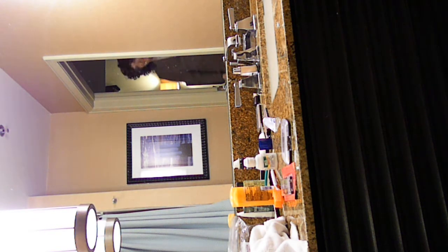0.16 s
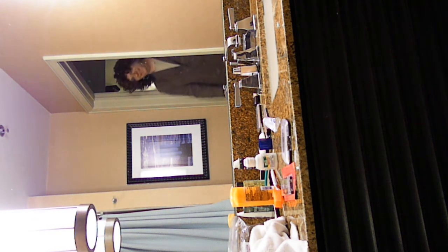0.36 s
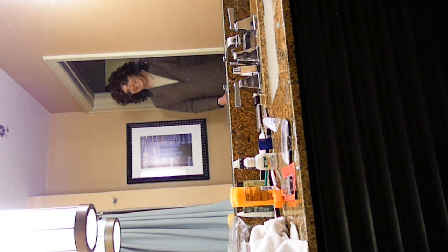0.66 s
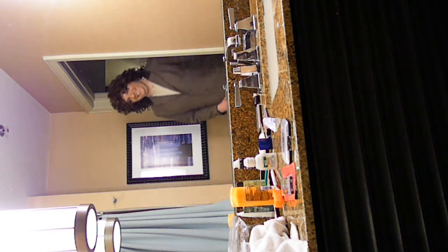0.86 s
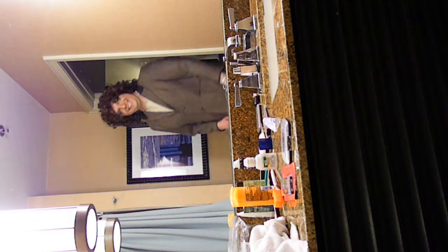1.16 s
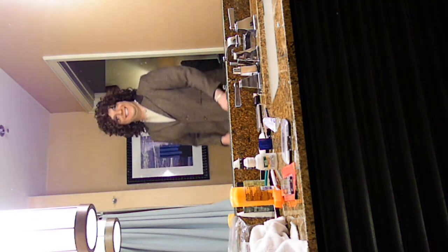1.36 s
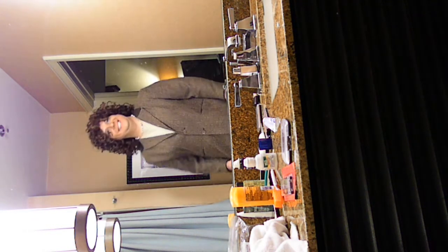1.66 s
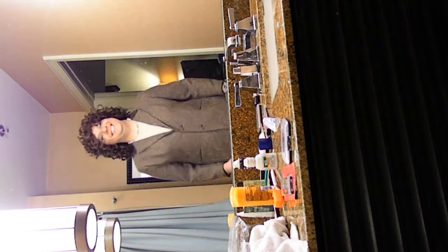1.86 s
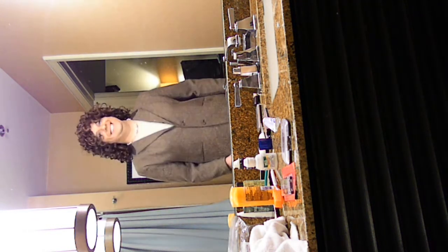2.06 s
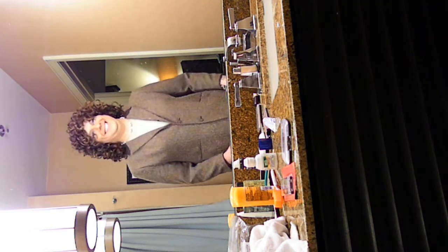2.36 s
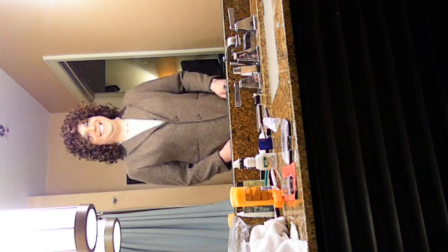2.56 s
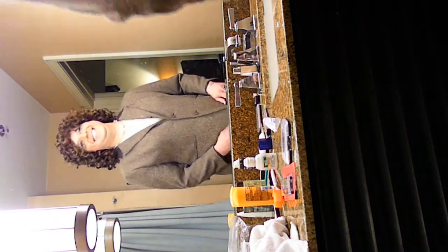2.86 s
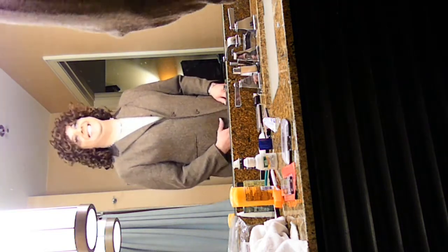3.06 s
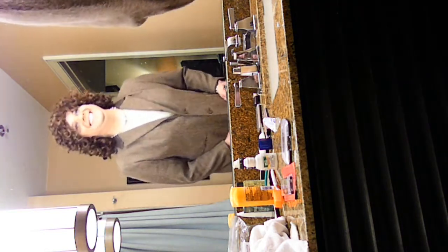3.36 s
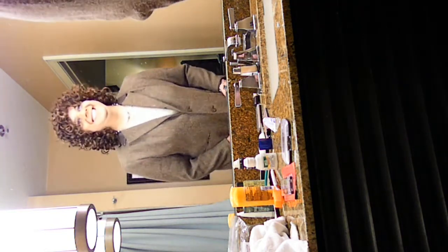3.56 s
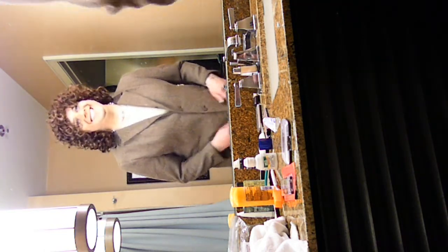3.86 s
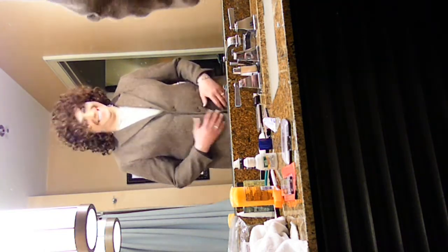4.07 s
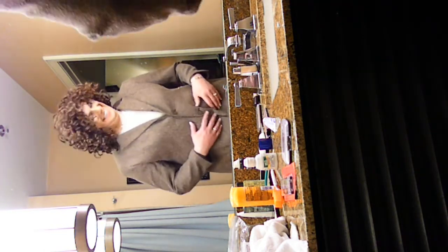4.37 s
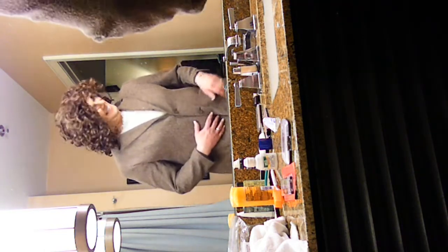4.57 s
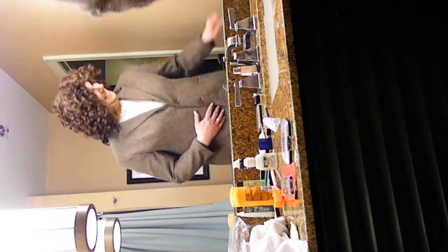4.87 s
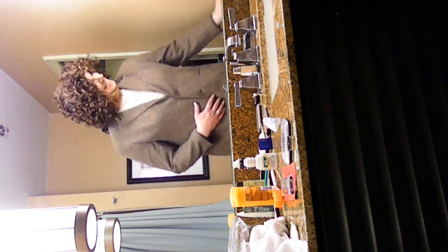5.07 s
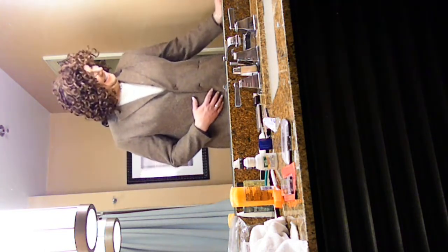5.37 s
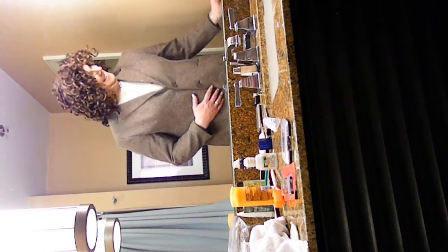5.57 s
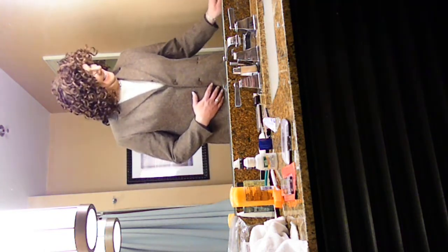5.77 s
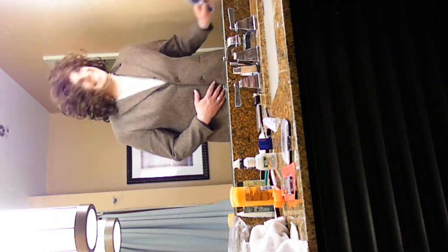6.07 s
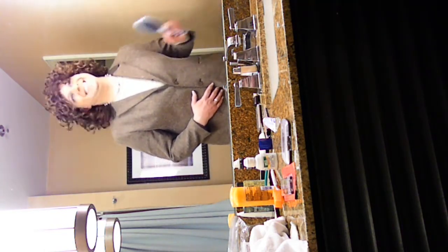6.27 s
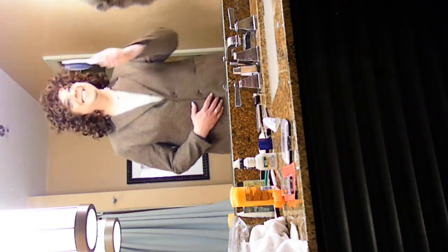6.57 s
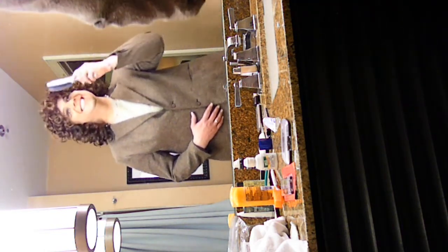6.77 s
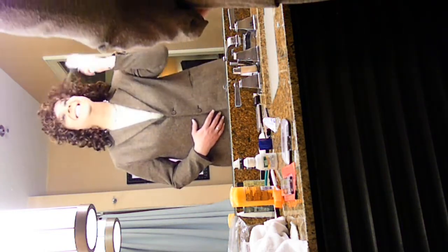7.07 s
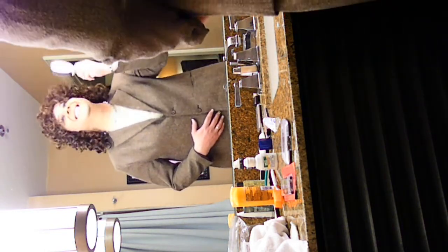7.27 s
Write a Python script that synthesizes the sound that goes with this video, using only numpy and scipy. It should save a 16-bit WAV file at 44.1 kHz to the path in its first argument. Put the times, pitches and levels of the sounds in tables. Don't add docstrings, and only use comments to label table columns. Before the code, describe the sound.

Hard heels knock across a tiled bathroom, quick at first then slower and softer, with rustling clothes, a brief metal jingle and a hairbrush clack.

```python
import sys
import numpy as np
from scipy import signal
from scipy.fft import rfft
from scipy.io import wavfile
from scipy.ndimage import uniform_filter1d

SR = 44100
rng = np.random.default_rng(int(sys.argv[2]) if len(sys.argv) > 2 else 0)


def to_linear_factor(level_db):
    exponent = np.asarray(level_db, float) / 20
    return 10 ** exponent


def to_wav(sig):
    pcm = np.clip(np.atleast_2d(sig), -1, 1) * 32767
    pcm = np.round(pcm).astype(np.int16)
    wavfile.write(sys.argv[1], SR, pcm.T)


N = 327663


def evened(x):
    return x / np.sqrt(np.mean(x ** 2) + 1e-20)


def read(points, hz):
    f, value = np.transpose(points)
    return np.interp(np.log(hz + 1), np.log(f + 1), value)


def add(mix, start_s, sound):
    part = mix[round(start_s * SR):][:len(sound)]
    part += sound[:len(part)]


def click(db):
    log_gain = np.log(to_linear_factor(np.maximum(db, -100)))
    circle = np.concatenate([log_gain, log_gain[-2:0:-1]])
    return np.fft.ifft(np.exp(np.conj(signal.hilbert(circle)))).real[:2048]


def noise(db, size=N):
    frames = size // 512 + 5
    a, b = rng.standard_normal((frames, 1025, 2)).T
    spectra = (a + 1j * b) * to_linear_factor(db)
    return signal.istft(spectra, nperseg=2048, noverlap=1536)[1][:size]


def room(direct_db):
    # (frequency [Hz], t60 [s])
    tiles = [(100, 0.4), (400, 0.5), (1000, 0.37), (2500, 0.45), (6000, 0.32), (14000, 0.14)]
    t = np.arange(SR * 3 // 4) / SR
    f, when, z = signal.stft(rng.standard_normal(len(t)), SR, nperseg=256)
    decay_db = -60 * when / read(tiles, f)[:, None]
    tail = signal.istft(z * to_linear_factor(decay_db), SR, nperseg=256)[1][:len(t)]
    tail *= 1 - np.exp(-t / 0.0017)
    power = uniform_filter1d(abs(rfft(tail, 2 ** 15)) ** 2, size=96)[::8]
    flatten = click(-10 * np.log10(power / power.mean()))
    tail = signal.fftconvolve(tail, flatten)[:len(t)]
    out = tail / np.linalg.norm(tail)
    out[0] += to_linear_factor(direct_db)
    return out


def ring(modes, seconds, longest_s):
    t = np.arange(round(seconds * SR)) / SR
    hz, db, t60_s = np.transpose(modes)[:, :, None]
    envelope = to_linear_factor(db - 60 * t / np.clip(t60_s, .01, longest_s))
    out = (envelope * np.sin(2 * np.pi * (hz * t + rng.random(hz.shape)))).sum(0)
    return out / abs(out).max()


def blow(colour, boom_db, knock_db, clack_db, direct_db):
    hz = np.fft.rfftfreq(4096, 1 / SR)
    shade = read([(200, boom_db), (400, 0.012), (900, knock_db), (2500, clack_db)], hz)
    push = click(read(colour, hz) + shade)
    sound = signal.fftconvolve(push, room(direct_db))[:SR * 3 // 4]
    return sound / abs(sound).max()


def puff(db, hz, width, hold_s, t60_s):
    t, f = np.arange(9000) / SR, np.fft.rfftfreq(4096, 1 / SR)
    decay_db = -60 * np.maximum(t - hold_s, 0) / max(t60_s, .001)
    burst = rng.standard_normal(len(t)) * to_linear_factor(decay_db)
    burst = signal.fftconvolve(burst, click(-12 * (np.log((f + 1) / hz) / width) ** 2))
    return to_linear_factor(db) * burst / abs(burst).max()


def heels():
    # (time [s], level of first 80 ms [dB], favoured mode 1 [Hz], favoured mode 2 [Hz])
    strikes = [
        (0.2429, -20.5, 291, 585),
        (0.8786, -17, 435, 385),
        (1.4719, -17, 480, 291),
        (2.064, -19, 282, 386),
        (2.7067, -25.5, 440, 575),
        (3.2518, -24, 418, 500),
        (4.7753, -27.5, 258, 381),
        (6.469, -28.5, 366, 480),
    ]
    # (early slap [dB], boom [dB], knock [dB], clack [dB])
    strike_shades = [(-0.5, 3, 3, 16), (2, -0.5, -4, 6), (1.5, 1, 2, 14.5), (2.5, 2, -5, 5.5), (4, 1, 3, 9),
                     (3, 3, 1, 16), (3.5, 7, -6.5, 1), (3, 2, -0.5, 7)]
    # (frequency [Hz], level [dB])
    heel_colour = [(40, -56.5), (80, -20), (140, -10.5), (250, -6), (400, 2), (700, -3), (1000, -13),
                   (1300, -23), (1550, -32.5), (1800, -42.5), (2500, -48), (3500, -57.5), (6000, -61),
                   (12000, -100)]
    # (frequency [Hz], level [dB], t60 [s])
    air_modes = [(160.9, -8.5, .6), (214.9, -3, 0.49), (269.3, -4.5, 0.64), (291, -1, 0.38),
                 (338, -7, 0.45), (366, -1, 0.52), (427.2, 1, 0.37), (480, 0, 0.37), (538, -5, 0.62),
                 (585, -6.5, 0.41), (688, -7, 0.61), (734, -11, 0.35), (877, -22.5, 0.59),
                 (940, -16.5, 0.56)]
    favour_db, favour_octaves = 8, 0.12
    out, t = np.zeros(N), np.arange(SR * 3 // 4) / SR
    low_cut = signal.butter(3, 105, "high", fs=SR, output="sos")
    hz, mode_db, t60_s = np.transpose(air_modes)
    for (start_s, db, *spot_hz), (slap_db, *shades) in zip(strikes, strike_shades):
        favour = sum(np.exp(-(np.log2(hz / f) / favour_octaves) ** 2) for f in spot_hz)
        modes = np.transpose([hz, mode_db + favour_db * favour, t60_s])
        air = ring(modes, .75, longest_s=0.76) * (1 - np.exp(-(t / 0.0022) ** 2))
        push = blow(heel_colour, *shades, direct_db=slap_db - 13.0)
        sound = evened(air) + evened(push)
        sound *= to_linear_factor(slap_db * np.exp(-(t / .036) ** 3))
        sound = signal.sosfilt(low_cut, sound)
        add(out, start_s, to_linear_factor(db + 0.98) * sound / np.std(sound[:SR * 2 // 25]))
    return out


def brush():
    # (time [s], peak [dB], boom [dB], knock [dB], clack [dB])
    knocks = [
        (5.5091, -21, -7, -12, 23),
        (5.514, -19, -6, 2, 8.5),
        (5.522, -20.5, 4, 0, -9),
        (5.545, -35, 6, -7, -7),
    ]
    # (frequency [Hz], level [dB])
    brush_colour = [(53, -67), (90, -20), (158, -3.5), (483, 0), (586, -7.5), (942, -9), (1720, -17.5),
                    (2480, -24), (2710, -28.5), (3150, -28), (15500, -37.5)]
    # (frequency [Hz], level [dB], t60 [s])
    handle = [(172, 0, 0.6), (364, 4.5, 0.4), (443, -2.5, 0.44), (964, 1, 0.19), (1317, 2, 0.11),
              (1541, 1.5, 0.15), (1920, -12, 0.19), (2486, -4.5, 0.18), (3200, -10, 0.11),
              (3420, -2, 0.036), (4780, -6, 0.056)]
    out = np.zeros(N)
    for start_s, db, *shades in knocks:
        add(out, start_s, to_linear_factor(db) * blow(brush_colour, *shades, direct_db=-15.0))
        add(out, start_s, to_linear_factor(db - 0.5) * ring(handle, .5, longest_s=0.53))
    return signal.sosfilt(signal.butter(2, 120, "high", fs=SR, output="sos"), out)


def taps():
    # (time [s], peak [dB], low group [Hz], high group [Hz], t60 [s])
    touches = [
        (7.095, -40, 500, 873, 0.32),
        (7.139, -29.5, 484, 1018, 0.16),
        (7.15, -48, 463, 940, 0.093),
        (7.168, -31, 248, 480, 0.11),
        (7.225, -41, 480, 1020, 0.11),
    ]
    out = np.zeros(N)
    for start_s, db, low_hz, high_hz, t60_s in touches:
        hz = np.outer([low_hz, high_hz], [.9, .95, 1, 1.04, 1.09]).ravel()
        sound = ring([(f, 0, t60_s) for f in hz], 0.12, longest_s=.3)
        soft_start = np.minimum(np.arange(len(sound)) / 60, 1)
        add(out, start_s, to_linear_factor(db) * sound * soft_start)
    return out


def jingle():
    # (time [s], level [dB])
    touches = [
        (.666, -31),
        (.674, -22),
        (.681, -19),
        (.686, -14.5),
        (.692, -20),
        (.703, -39),
        (0.717, -38),
        (.762, -27),
    ]
    # (frequency [Hz], level [dB], t60 [s])
    metal = [(4640, -9, .15), (4864, -4, .2), (4987, -1, .2), (5024, -2, .25), (5324, -4, .15),
             (5375, -5, .15), (5820, -4, .15), (6015, -2, .18), (6205, -5, .12), (7214, -6, .12),
             (7605, -4, .18), (8630, -6, .1)]
    # (frequency [Hz], level [dB])
    cluster = [(1760, -54), (3000, -24.5), (4420, -12.5), (4870, -1), (6110, -6), (6500, -9), (7260, -4),
               (7860, 0), (8410, -6.5), (13000, -32)]
    out = np.zeros(N)
    soft_start = 1 - np.exp(-np.arange(SR // 5) / SR / 0.0017)
    for start_s, db in touches:
        hz = np.exp(rng.uniform(np.log(2600), np.log(12500), size=110))
        t60_s = rng.uniform(0.026, 0.082, size=110)
        crowd = np.transpose([hz, read(cluster, hz), t60_s])
        sound = to_linear_factor(-13.5) * ring(metal, .2, longest_s=0.18) + ring(crowd, .2, longest_s=.1)
        add(out, start_s, to_linear_factor(db) * soft_start * sound)
    return signal.oaconvolve(out, room(direct_db=2.0))[:N]


def cloth():
    # (peak time [s], level [dB], rise [s], fall [s]); rise and fall span slope_db
    moves = [(.02, -54.5, 0.084, 0.46), (.255, -53, 0.018, .05), (.325, -43.5, 0.019, 0.14),
             (.62, -50, 0.23, 0.26), (.78, -48.5, .02, 0.056), (.9, -49.5, 0.032, 0.041),
             (1.02, -49.5, .08, .08), (1.28, -50.5, 0.44, .08), (1.46, -51, 0.27, 0.11),
             (1.63, -49, .04, 0.044), (1.8, -49.5, 0.25, 0.16), (2.08, -51.5, 0.16, 0.1),
             (2.27, -48.5, 0.053, 0.43), (2.53, -50, .3, .1), (2.95, -47.5, .12, .14),
             (3.19, -48, 0.026, 0.11), (3.4, -55, 0.18, 0.33), (3.95, -53.5, 0.089, .25),
             (4.54, -51, .2, 0.086), (4.68, -58.5, .1, 0.11), (4.84, -57, 0.1, 0.11), (5.02, -60, .1, 0.23),
             (5.44, -59, 0.052, 0.38), (6.23, -58, .12, 0.11), (6.7, -51.5, 0.33, 0.51),
             (6.87, -60, 0.14, 0.057), (7.109, -53, 0.062, 0.1), (7.19, -58, 0.12, 0.029)]
    # (frequency [Hz], level [dB])
    swish_colour = [(500, -22), (1000, 0), (1400, -1), (2000, -4), (3000, -3), (5000, -1), (8000, -0.5),
                    (12000, -37)]
    # (frequency [Hz], level [dB])
    fizz_colour = [(4000, -10), (7000, -10.5), (9000, -2.5), (12000, -5), (15800, -13)]
    slope_db, fizz_db, fizz_steepness, pivot_db = 10, 0.4, 1.21, -48
    hz, t = np.fft.rfftfreq(2048, 1 / SR), np.arange(0, N, 64) / SR
    peak_s, db, rise_s, fall_s = np.transpose(moves)[:, :, None]
    before = (peak_s - t) / np.maximum(rise_s, .003)
    after = (t - peak_s) / np.maximum(fall_s, .003)
    away = np.where(t < peak_s, before, after)
    power = (to_linear_factor(db - slope_db * away) ** 2).sum(0)
    effort_db = np.interp(np.arange(N) / SR, t, 10 * np.log10(power + 1e-12))
    grain = to_linear_factor(0.8 * evened(uniform_filter1d(rng.standard_normal(N), 200)))
    swish = evened(grain * noise(read(swish_colour, hz)[:, None])) * to_linear_factor(effort_db)
    fizz_level_db = pivot_db + fizz_db + fizz_steepness * (effort_db - pivot_db)
    fizz = evened(grain * noise(read(fizz_colour, hz)[:, None])) * to_linear_factor(fizz_level_db)
    return swish + fizz


def snaps():
    # (time [s], peak [dB], centre [Hz])
    ticks = [
        (.3155, -32, 12000),
        (2.211, -36, 13000),
        (2.29, -32, 11000),
        (2.334, -30, 10500),
        (2.3674, -25, 11300),
    ]
    out = np.zeros(N)
    for start_s, db, hz in ticks:
        add(out, start_s, puff(db, hz, width=.35, hold_s=0.00043, t60_s=0.0031))
    return out


def squeaks():
    # (time [s], peak [dB], centre [Hz])
    chirps = [
        (4.66, -58, 11200),
        (4.82, -55, 11200),
        (4.95, -56, 10600),
        (5.46, -46, 9860),
    ]
    out = np.zeros(N)
    for start_s, db, hz in chirps:
        add(out, start_s, puff(db, hz, width=.025, hold_s=0.018, t60_s=.06))
    return out


def bristles():
    # (time [s], peak [dB], centre [Hz], hold [s])
    strokes = [(5.459, -40, 12500, 0.017), (5.5, -48, 11000, .015), (5.598, -50, 5630, .2),
               (5.625, -40, 11500, .02), (5.672, -33.5, 12000, 0.024), (5.728, -40, 11000, .027),
               (5.786, -39, 11300, .035), (5.885, -43.5, 10500, .008), (5.924, -41.5, 6000, 0.059),
               (6.049, -40, 5500, 0.022)]
    out = np.zeros(N)
    for start_s, db, hz, hold_s in strokes:
        add(out, start_s, puff(db, hz, width=0.73, hold_s=hold_s, t60_s=0.19))
    return out


def scuffs():
    # (time [s], peak [dB], centre [Hz], relative width [1], hold [s])
    rubs = [(.315, -43, 9800, 0.35, 0.018), (2.666, -34.5, 1000, 1, .005), (7.093, -45, 610, 1, .06),
            (7.138, -45, 950, 0.59, 0.08), (6.055, -40, 3100, 1, .002)]
    out = np.zeros(N)
    for start_s, db, hz, width, hold_s in rubs:
        add(out, start_s, puff(db, hz, width, hold_s, t60_s=0.076))
    return out


def sway():
    # (time [s], level [dB])
    shifts = [(.39, -58), (1.6, -54), (2.75, -60), (3.3, -65), (6.5, -64)]
    sway_hz, sway_s = 30, .08
    t, out = np.arange(N) / SR, np.zeros(N)
    for peak_s, db in shifts:
        swell = to_linear_factor(db) * np.exp(-((t - peak_s) / sway_s) ** 2)
        out += swell * np.sin(2 * np.pi * (sway_hz * t + rng.random()))
    return out


def hum():
    # (frequency [Hz], level [dB])
    vent_colour = [(12, -46), (20, -13.5), (70, -16), (137, -5.5), (226, 1), (307, -4), (373, -1.5),
                   (467, -3.5), (793, -5.5), (2100, -17.5), (6410, -20.5), (7800, -21), (8720, -22),
                   (10300, -20), (15600, -24)]
    # (frequency [Hz], lift [dB])
    air_lifts = [(120, 0.5), (161, 11.5), (215, 1.5), (262, 4.5), (292, 6.5), (370, 8.5), (430, 2.5),
                 (490, 9), (630, 5), (678, 2.5)]
    hum_db, stir_db = -49, 1.4
    hz, frames = np.fft.rfftfreq(2048, 1 / SR)[:, None], N // 512 + 5
    lift = sum(db / (1 + ((hz - f) / 9) ** 2) for f, db in air_lifts)
    patches = uniform_filter1d(rng.standard_normal((frames, 1025)).T, 20, 0)
    patches = evened(uniform_filter1d(patches, 8, 1))
    stir = stir_db / (1 + (hz / 1500) ** 2)
    return to_linear_factor(hum_db) * evened(noise(read(vent_colour, hz) + lift + patches + stir))


def drones():
    # (frequency [Hz], width [Hz], level [dB])
    resonances = [(160.4, 6.4, -59.5), (219.4, 17, -58.5)]
    out = np.zeros(N)
    for hz, width_hz, db in resonances:
        b, a = signal.iirpeak(hz, hz / width_hz, SR)
        out += to_linear_factor(db) * evened(signal.lfilter(b, a, rng.standard_normal(N)))
    return out


def motor():
    # (frequency [Hz], rms level [dB])
    tones = [(59.2, -71.5), (118.4, -63)]
    t = np.arange(N) / SR
    return sum(np.sqrt(2) * to_linear_factor(db) * np.sin(2 * np.pi * (hz * t + rng.random())) for hz, db in tones)


def scene():
    contacts = heels() + brush() + taps() + jingle()
    rubbing = cloth() + snaps() + squeaks() + bristles() + scuffs()
    background = sway() + hum() + drones() + motor()
    return (contacts + rubbing + background)[None]


def roll_off(x):
    return signal.sosfilt(signal.butter(12, 15800, fs=SR, output="sos"), x)


def record(dry):
    dip_hz, dip_width_hz, dip_db, edge_hz = 7857, 210, -17.5, 15800
    hz = np.fft.rfftfreq(4096, 1 / SR)
    dip = click(dip_db / (1 + ((hz - dip_hz) / dip_width_hz) ** 2))
    edge = signal.firwin(801, edge_hz, window=("kaiser", 9), fs=SR)
    mix = signal.oaconvolve(dry, dip[None])[:, :N]
    mix = signal.oaconvolve(mix, edge[None], "same")
    return roll_off(mix)


dry = scene()
out = record(dry)
to_wav(out)
```